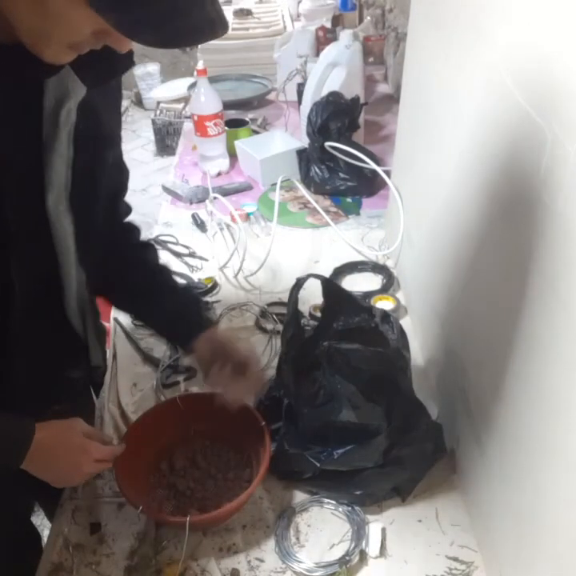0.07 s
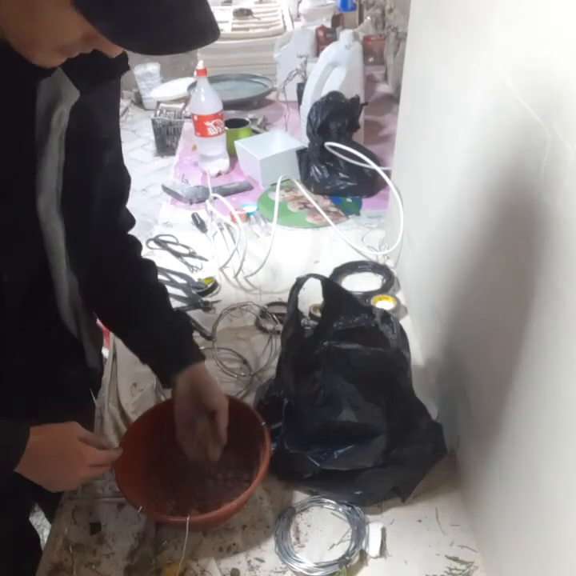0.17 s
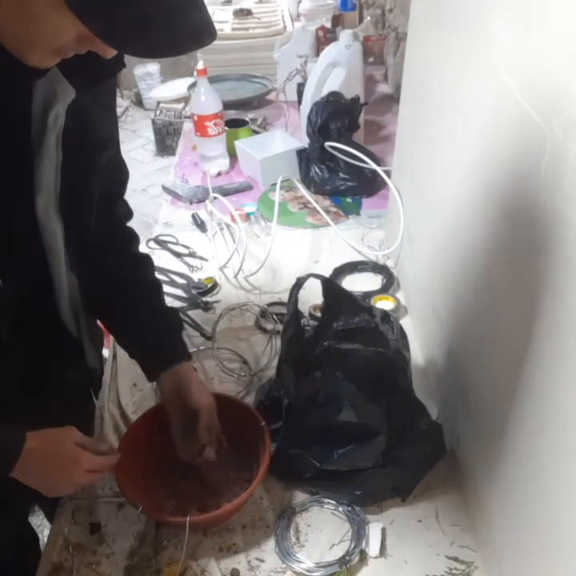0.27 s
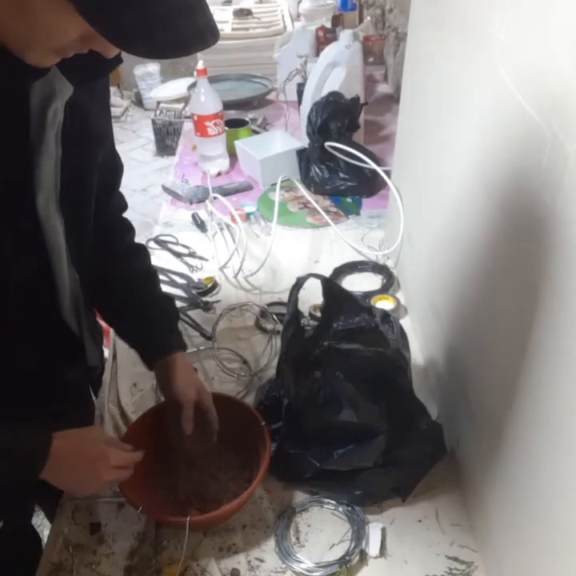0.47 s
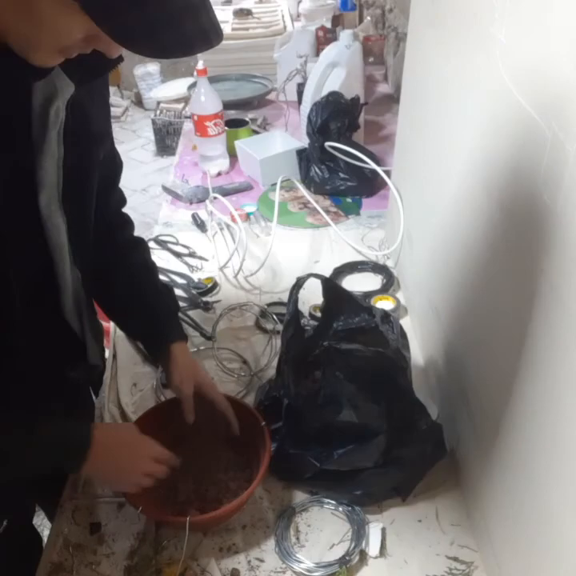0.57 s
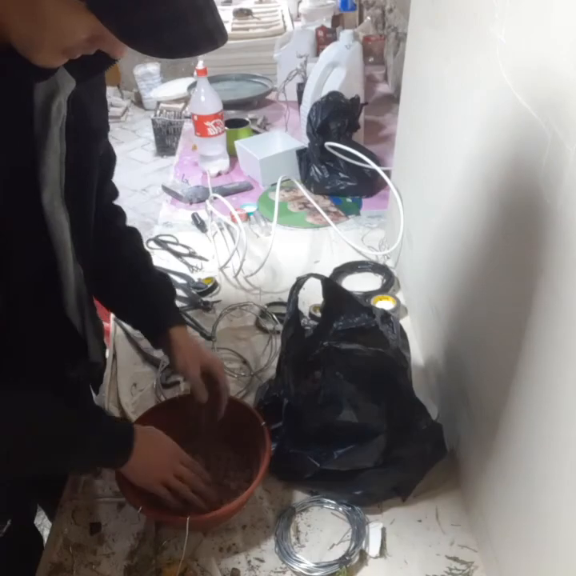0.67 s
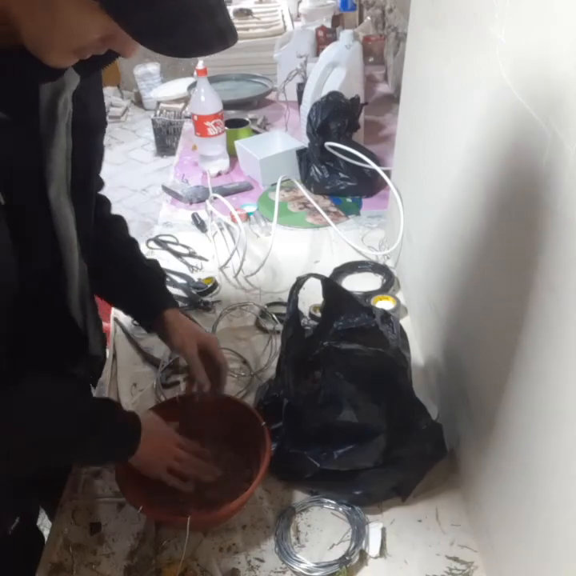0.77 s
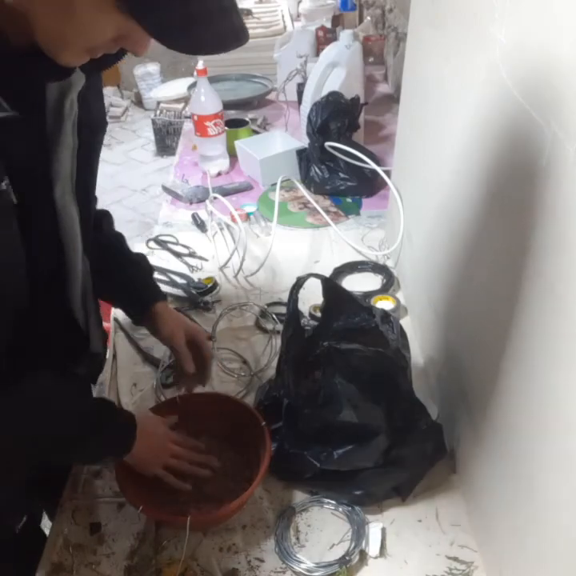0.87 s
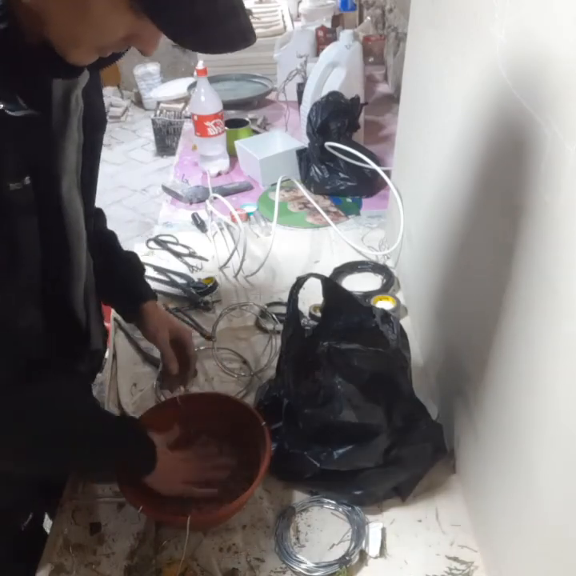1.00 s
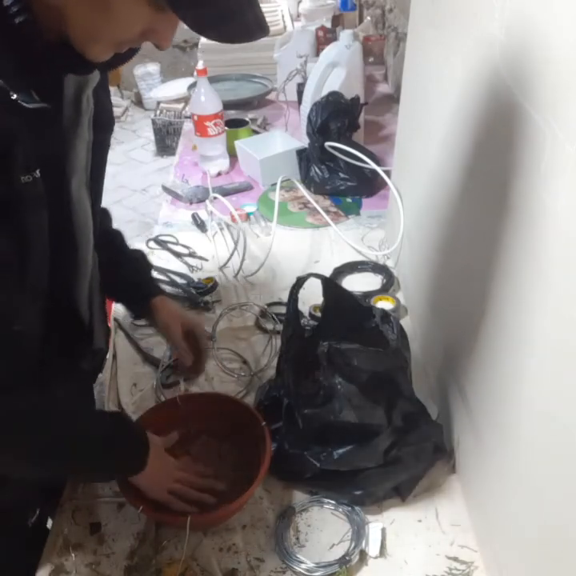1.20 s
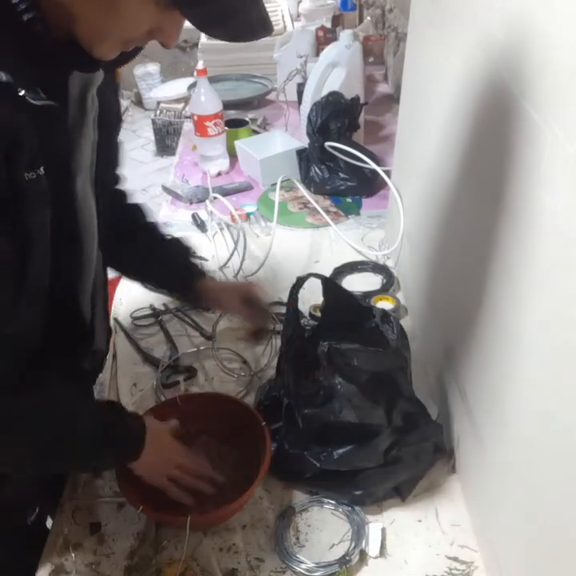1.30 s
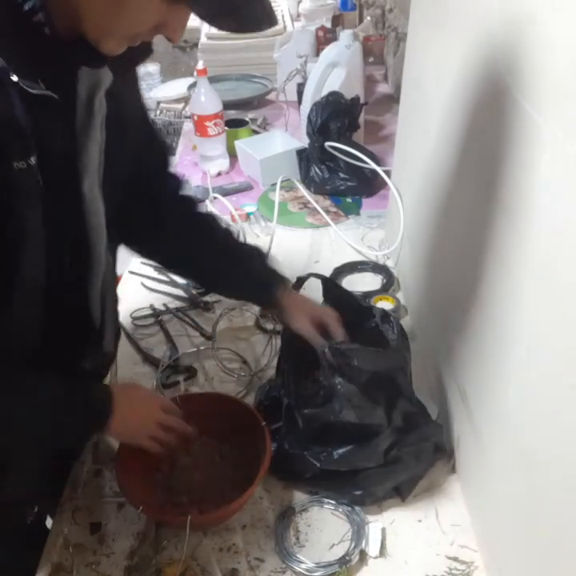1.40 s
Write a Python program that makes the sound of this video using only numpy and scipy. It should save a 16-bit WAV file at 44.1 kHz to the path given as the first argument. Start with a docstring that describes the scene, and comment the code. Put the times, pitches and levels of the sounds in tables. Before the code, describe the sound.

Hands scrape through loose grit in a plastic bowl. Fingers dig first, knocking lumps against the sides, then a palm makes a few crackling sweeps. The table thumps faintly underneath, heard nearby in a small room.

```python
"""Fingers dig into loose, gritty material and lumps knock against its plastic bowl.
Then a palm makes three scraping sweeps while the grit crackles. Tiny contacts ring the bowl's modes
and hiss between the grains; the table and bowl boom as the hands push.
A small room answers over a low rumble; the right microphone hears far more of the treble."""
import sys
import numpy as np
from scipy import signal
from scipy.fft import rfft, irfft
from scipy.io import wavfile
from scipy.ndimage import uniform_filter1d

SR = 44100
rng = np.random.default_rng(int(sys.argv[2]) if len(sys.argv) > 2 else 0)


def master_out(mix):
    """Clip the mix to full scale and print it as 16-bit PCM to the path in sys.argv[1]."""
    frames = np.transpose(np.atleast_2d(mix))
    ceiling = np.clip(frames, -1, 1)
    pcm = np.round(ceiling * 32767).astype(np.int16)
    wavfile.write(sys.argv[1], SR, pcm)


N = 63945


def amp(db):
    """Decibels to gain."""
    return 10 ** (np.asarray(db) / 20)


def unit(x):
    """Scales to rms 1."""
    return x / np.sqrt(np.mean(x ** 2) + 1e-20)


def at_hz(table, hz, column=1):
    """Table column interpolated over log frequency."""
    columns = np.transpose(table)
    return np.interp(np.log(hz + 1), np.log(columns[0] + 1), columns[column])


def envelope(table, column=1):
    """Gain per sample from a dB column over time."""
    columns = np.transpose(table)
    return amp(np.interp(np.arange(N) / SR, columns[0], columns[column]))


def add(mix, start_s, sound):
    """Mixes a sound in at start_s."""
    part = mix[max(round(start_s * SR), 0):][:len(sound)]
    part += sound[:len(part)]


def bins_hz(size=4096):
    """FFT bin frequencies."""
    return np.fft.rfftfreq(size, 1 / SR)


def ring(x, gain):
    """Minimum-phase filter with the given gain per bin."""
    log_gain = np.log(np.maximum(np.r_[gain, gain[-2:0:-1]], 1e-5))
    response = np.fft.ifft(np.exp(np.conj(signal.hilbert(log_gain)))).real
    return signal.fftconvolve(x, response[:len(gain)])[:len(x)]


def mode_gain(modes, hz):
    """Gain of damped modes, summed in power."""
    return np.sqrt(sum(amp(db) ** 2 / (1 + ((hz - mode_hz) / (width_hz / 2)) ** 2) ** 2
                       for mode_hz, width_hz, db in modes))


def noise(colour):
    """Steady coloured noise, rms 1."""
    return unit(irfft(rfft(rng.standard_normal(N)) * amp(at_hz(colour, bins_hz(N))), N))


def steadied(x, size=3000, min_power=1e-20):
    """Divides out the running rms, removing slow swells."""
    return x / np.sqrt(abs(uniform_filter1d(x ** 2, size)) + min_power)


def grains(per_s, gain, spread_db=2.5):
    """Dense, uneven contacts ringing a filter, rms 1."""
    signs = rng.choice([-1., 1.], N)
    strengths = amp(spread_db * np.minimum(rng.exponential(1, N), 5))
    contacts = signs * strengths * (rng.random(N) < per_s / SR)
    return unit(ring(steadied(contacts, size=500, min_power=1e-3), gain))


def burst(gain, hold_s, rise_s=.0005, fall_s=.0012, per_s=7000, size=3000):
    """Short cluster of contacts ringing a filter, rms about 1 while it holds."""
    t = np.arange(size) / SR
    shape = np.minimum(t / rise_s, 1) * np.exp(-np.maximum(t - hold_s, 0) / fall_s)
    contacts = rng.choice([-1., 1.], size) * (rng.random(size) < per_s / SR)
    return unit(ring(shape * contacts, gain)) * np.sqrt(np.mean(shape ** 2))


# background spectrum: f/Hz, relative density/dB
BACKGROUND_COLOUR = [(20, -30), (45, -24), (85, -5), (115, -4), (170, -8.5), (240, -2), (330, -8.5),
                     (400, -19), (480, -6.5), (620, -21), (810, -8.5), (1160, -37.5), (2000, -26),
                     (2450, -19), (3600, -62), (5900, -49), (8500, -38), (13000, -29.5), (16000, -46)]


def background(level_db=-66.5, side_db=-4):
    """Steady low room noise, partly different in each channel."""
    side = amp(side_db) * noise(BACKGROUND_COLOUR) * np.array([[1], [-1]])
    return amp(level_db) * (noise(BACKGROUND_COLOUR) + side)


# table spectrum: f/Hz, relative density/dB
TABLE_COLOUR = [(20, -35), (45, -21), (62, -3.5), (72, -15.5), (85, 1.5), (105, -14.5), (150, -10.5),
                (215, -21.5), (300, -22), (450, -23.5), (1500, -62)]
# table rumble: t/s, level/dB
TABLE_LEVEL = [(0, -63), (.04, -53.5), (.1, -77), (.15, -58), (.35, -55.5), (.48, -56), (.584, -44),
               (.65, -58.5), (.746, -47), (.9, -56.5), (.944, -77), (1.0, -56), (1.11, -47), (1.2, -58),
               (1.3, -60.5), (1.45, -69.5)]
# low modes of the bowl on the table: f/Hz, width/Hz, relative gain/dB
BOOM_MODES = [(181.2, 35, 5), (268, 66, -10), (328, 17.7, 7.5)]
# bowl boom: t/s, level/dB
BOOM_LEVEL = [(0, -65.5), (.2, -71.5), (.33, -56.5), (.45, -53.5), (.6, -58.5), (.67, -59), (.72, -51),
              (.82, -50.5), (.85, -58), (.93, -60), (.99, -62.5), (1.05, -61.5), (1.26, -61.5), (1.45, -71)]


def table_rumble():
    """The table and the bowl's low modes boom as the hands push."""
    boom = irfft(rfft(rng.standard_normal(N)) * mode_gain(BOOM_MODES, bins_hz(N)), N)
    table = noise(TABLE_COLOUR)
    return steadied(table) * envelope(TABLE_LEVEL) + steadied(boom) * envelope(BOOM_LEVEL)


# room decay: f/Hz, T60/s
ROOM_T60 = [(100, 0.35), (450, 0.55), (900, 0.32), (2500, 0.22), (6000, 0.18), (16000, 0.25)]


def room_tail(size=22016, rise_s=.0047):
    """Sparse reflections, each band decaying at its own rate."""
    taps = rng.standard_normal(size) * (rng.random(size) < .1)
    taps *= np.minimum(np.arange(size) / SR / rise_s, 1)
    hz, t, bands = signal.stft(taps, SR, nperseg=256)
    decay = amp(-60 * t / at_hz(ROOM_T60, hz)[:, None])
    tail = signal.istft(bands * decay, SR, nperseg=256)[1]
    return tail / np.linalg.norm(tail)


# grain snaps: t/s, level/dB
GRAIN_SNAPS = [(.02, -54), (.167, -55), (.2075, -39), (.238, -32), (.457, -40), (.6015, -35), (.6135, -21),
               (.671, -43), (.698, -43), (.7115, -34), (.808, -34), (.96, -54)]
# snap spectrum: f/Hz, relative level/dB
SNAP_SPECTRUM = [(100, -30.5), (1500, -32), (4000, -10), (6000, -8.5), (7700, -2), (9000, -4.5), (11000, 7),
                 (15800, 3.5), (17000, 4)]


def snaps():
    """Single grains give way with a bright tick."""
    out = np.zeros(N)
    gain = amp(at_hz(SNAP_SPECTRUM, bins_hz()))
    for start_s, db in GRAIN_SNAPS:
        add(out, start_s, amp(db) * burst(gain, hold_s=.002))
    return out


# modes of the filled bowl: f/Hz, width/Hz, gain/dB
BOWL_MODES = [(469, 94, -5), (722, 130, 0), (857, 98, 1), (1300, 263, 1), (1627, 120, 1), (1956, 130, 1),
              (2124, 88, -1.5), (2388, 420, 3.5), (2570, 53, 0.5), (2804, 220, 0.5), (3160, 190, -4.5),
              (4340, 830, -15)]
# response between modes: f/Hz, gain/dB
BOWL_FLOOR = [(60, -21.5), (200, -17.5), (350, -17), (1000, -4), (2700, -5), (3600, -11), (6000, -19),
              (8000, -21.5), (16000, -47)]


def bowl_gain(drive):
    """The bowl's damped response to a drive spectrum."""
    hz = bins_hz()
    return np.hypot(mode_gain(BOWL_MODES, hz), amp(at_hz(BOWL_FLOOR, hz))) * amp(at_hz(drive, hz))


# finger dig, palm sweeps: t/s, scrape level/dB, hiss level/dB
FINGER_DIG = [(0, -66.5, -61.5), (.13, -79, -69), (.214, -66.5, -52), (.238, -30.5, -31.5),
              (.268, -31, -40.5), (.297, -41.5, -43.5), (.32, -31.5, -41), (.337, -41, -36),
              (.385, -29, -37), (.432, -42, -58), (.478, -49, -44.5), (.492, -30.5, -28.5),
              (.52, -30.5, -37.5), (.568, -34.5, -31), (.598, -41.5, -63), (.685, -51.5, -59)]
PALM_SWEEPS = [(0.704, -39, -46.5), (0.732, -33.5, -37), (.747, -23.5, -40), (.778, -28, -33),
               (0.795, -29.5, -38), (0.821, -30, -41.5), (.832, -43.5, -70), (.90, -57, -65),
               (.965, -69, -68), (.99, -43, -48), (1.011, -33, -45.5), (1.038, -37, -44.5),
               (1.068, -27, -38.5), (1.087, -37, -51), (1.13, -40, -55.5), (1.185, -51, -59.5),
               (1.209, -38, -50), (1.26, -45, -65), (1.294, -61, -67.5), (1.369, -73, -72),
               (1.45, -66.5, -66.5)]
# scrape drive, grit spectrum: f/Hz, relative level/dB
SCRAPE_DRIVE = [(100, -10), (250, 1.5), (480, 3.5), (1000, 0), (2400, -2), (5000, -2), (16000, -4)]
GRIT_SPECTRUM = [(100, -19.5), (1500, -12), (3500, -5), (6000, -2.5), (7700, -9), (9000, -7), (11000, 0),
                 (15800, 0.5), (17000, -48)]


def stirring():
    """Grains scrape on the plastic and hiss against each other."""
    strokes = FINGER_DIG + PALM_SWEEPS
    scrape = grains(per_s=4000, gain=bowl_gain(SCRAPE_DRIVE))
    hiss = grains(per_s=2400, gain=amp(at_hz(GRIT_SPECTRUM, bins_hz())))
    return scrape * envelope(strokes) + hiss * envelope(strokes, column=2)


# lump impacts: t/s, level/dB, hold/s, tilt/(dB/octave), spot f/Hz, crackle level/dB
LUMP_KNOCKS = [(0.2207, -25.5, 0.0086, -0.8, 1965, -33), (0.247, -18.5, 0.0062, -0.8, 1195, -30),
               (0.2717, -28, 0.011, -2, 1310, -42), (0.3028, -24.5, 0.0046, -4.9, 2500, -32.5),
               (0.341, -18, 0.0044, 2.2, 920, -43), (0.367, -22.5, 0.007, -4.4, 2300, -30),
               (0.389, -24.5, 0.0042, 5.5, 2300, -38), (0.438, -33.5, 0.0058, -11.5, 748, -39),
               (0.46, -21, 0.0053, -0.9, 1860, -35.5), (0.484, -20, 0.0013, 0.5, 1210, -25),
               (0.491, -22.5, 0.0028, -7, 1180, -23), (0.515, -33, .005, 6, 2700, -49),
               (0.539, -17, 0.0037, 3.5, 2300, -26), (0.5578, -20.5, 0.0019, 6.5, 3000, -26),
               (.567, -24, 0.0023, -4, 1300, -30), (0.717, -24.5, .003, 0.5, 2190, -51),
               (.739, -21.5, 0.01, -4.2, 2310, -30.5), (0.754, -25, 0.0044, -1.5, 1180, -48),
               (.772, -20, 0.0015, -3.5, 730, -70), (.817, -32, .004, 2, 1250, -38.5),
               (0.84, -34.5, 0.0025, -9.5, 1150, -62), (1.0194, -28.5, 0.0057, -1.5, 896, -52),
               (1.045, -22.5, 0.0031, 0, 1620, -43), (1.059, -25, 0.0065, -3, 1350, -59),
               (1.0705, -22, 0.0013, -3.5, 1260, -51), (1.406, -58.5, 0.0089, -5, 836, -91)]
# knock drive: f/Hz, relative level/dB
KNOCK_DRIVE = [(100, -8), (300, 0.5), (480, -0.5), (1000, 2), (2400, 2.5), (5000, 0.5), (16000, -14)]


def knocks(pivot_hz=1600, spot_db=7.5, spot_octaves=.11):
    """Each lump favours the bowl's modes at the spot it strikes, and the grit crackles."""
    out = np.zeros(N)
    body_gain = bowl_gain(KNOCK_DRIVE)
    grit_gain = amp(at_hz(GRIT_SPECTRUM, bins_hz()))
    hz = np.clip(bins_hz(), 400, 6000)
    for start_s, db, hold_s, db_per_octave, spot_hz, crackle_db in LUMP_KNOCKS:
        tilt_db = db_per_octave * np.log2(hz / pivot_hz)
        peak_db = spot_db * np.exp(-(np.log2(hz / spot_hz) / spot_octaves) ** 2)
        knock = burst(body_gain * amp(tilt_db + peak_db), hold_s, rise_s=.0018, fall_s=.004)
        crackle = burst(grit_gain, hold_s)
        add(out, start_s, amp(db) * knock + amp(crackle_db) * crackle)
    return out


# left-right likeness of the contacts: f/Hz, correlation/0-1
MIC_CORRELATION = [(100, 1), (450, 1), (750, 0.16), (1200, 0.78), (2000, 0.4), (3300, 0.12), (6000, 0.17),
                   (16000, 0.45)]
# microphone response: f/Hz, left gain/dB, right gain/dB
MIC_RESPONSE = [(99, 0, -4.5), (456, -3.5, -4), (845, 0.5, -5.5), (1240, -0.5, -4), (1560, -4, -6),
                (2430, 0, -11.5), (3470, -6, -6.5), (4500, -3, -5.5), (6600, -4, -1.5), (7780, -15.5, -6),
                (11000, -21, -2), (16000, -26.5, -5)]


def scene(room_db=-10.5):
    """Contacts all over the bowl reach two microphones partly alike, directly and via the room."""
    hz = bins_hz(N)
    left, independent = (snaps() + stirring() + knocks() for _ in range(2))
    alike = np.clip(at_hz(MIC_CORRELATION, hz), 0, 1)
    right = irfft(alike * rfft(left) + np.sqrt(1 - alike ** 2) * rfft(independent), N)
    channels = []
    for column, direct in enumerate([left, right], 1):
        heard = direct + amp(room_db) * signal.fftconvolve(direct, room_tail())[:N]
        channels.append(irfft(rfft(heard) * amp(at_hz(MIC_RESPONSE, hz, column)), N))
    return background() + table_rumble() + np.array(channels)


def record(dry, cutoff_hz=16150):
    """Steep low-pass band limit."""
    lowpass = signal.firwin(511, cutoff_hz, window=("kaiser", 9), fs=SR)
    return signal.oaconvolve(dry, lowpass[None], "same")


dry = scene()
out = record(dry)
master_out(out)
```